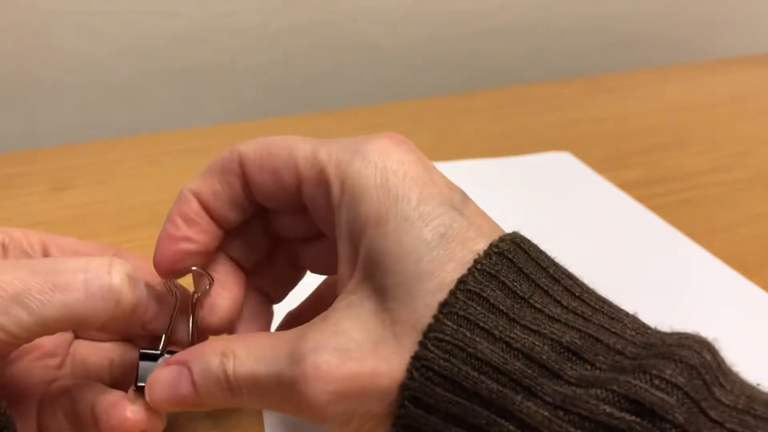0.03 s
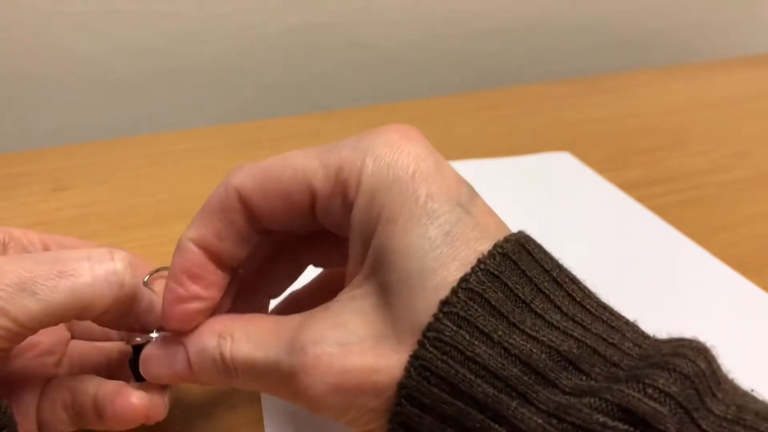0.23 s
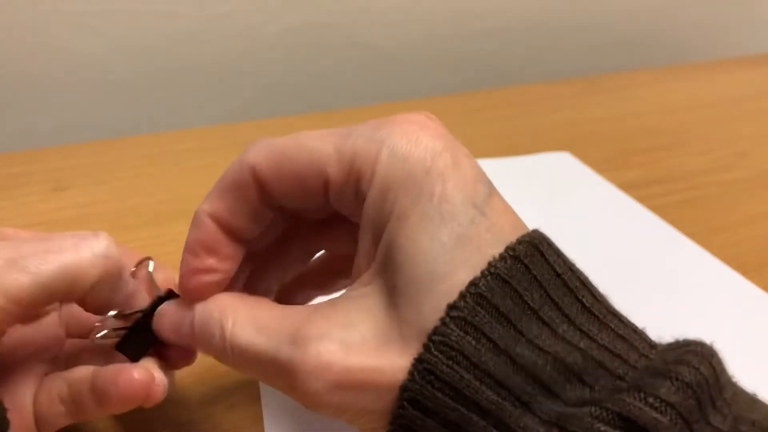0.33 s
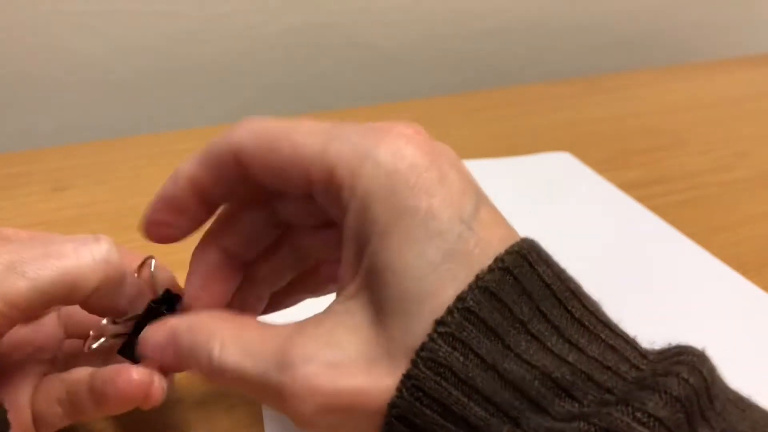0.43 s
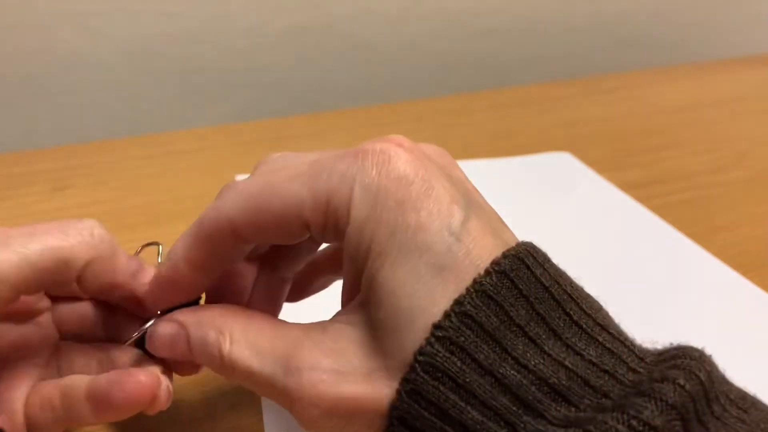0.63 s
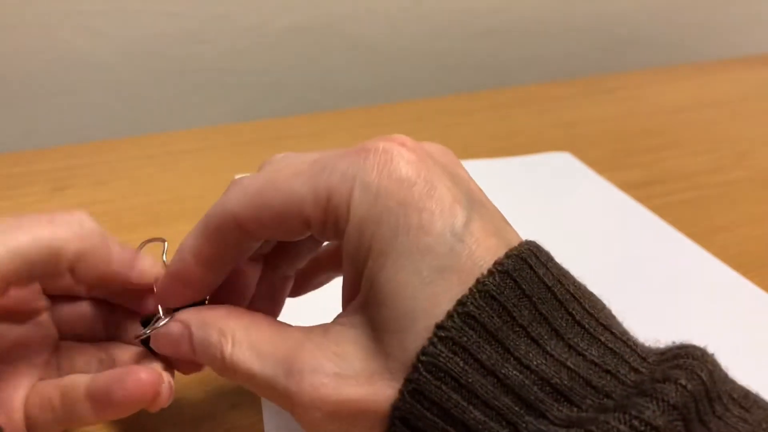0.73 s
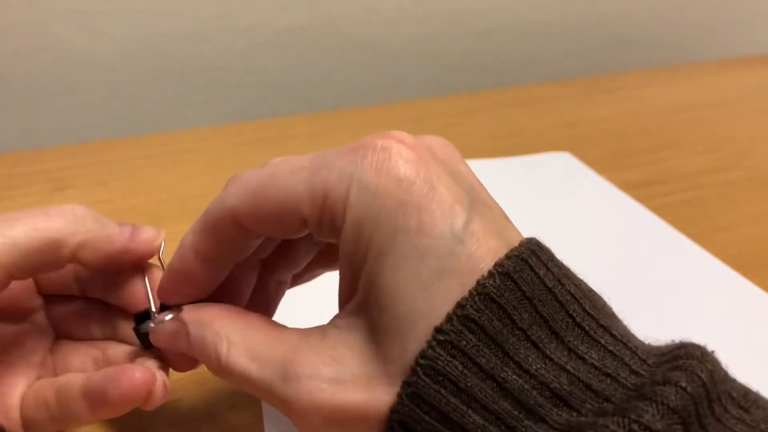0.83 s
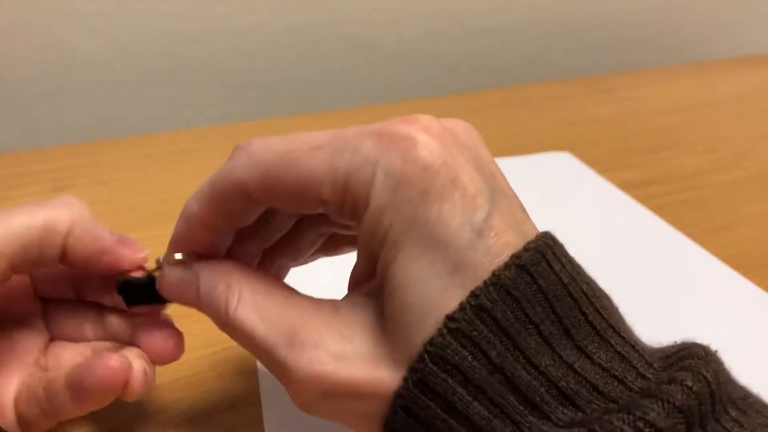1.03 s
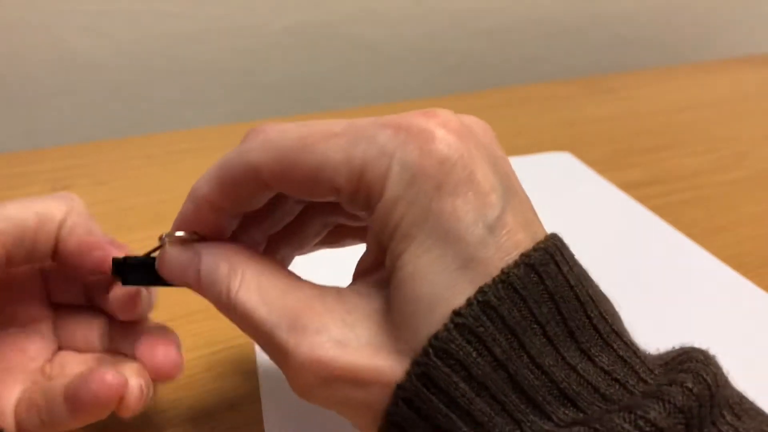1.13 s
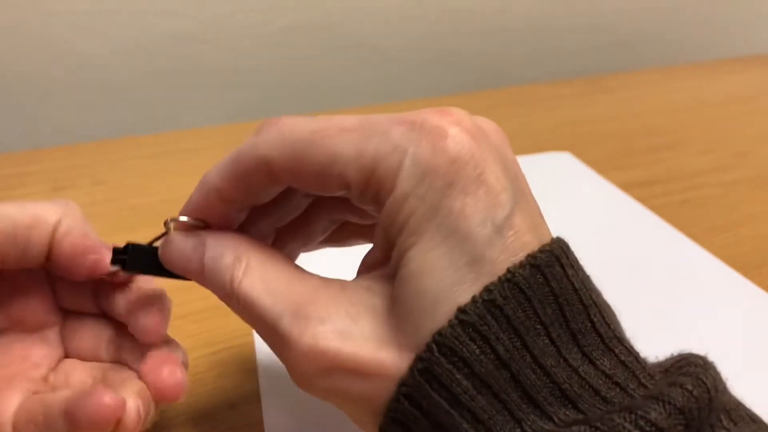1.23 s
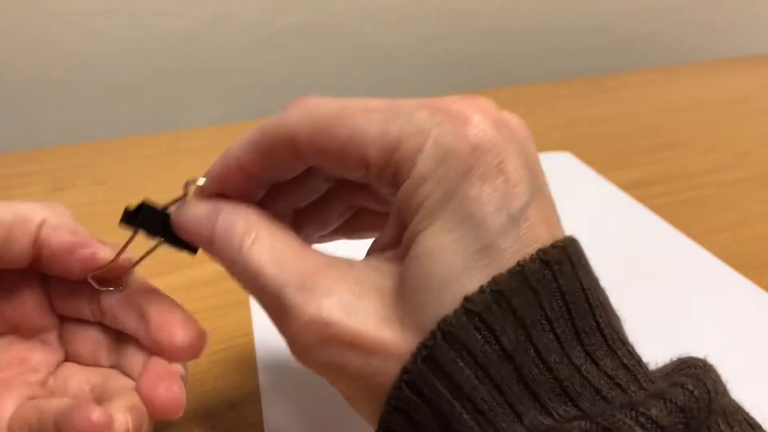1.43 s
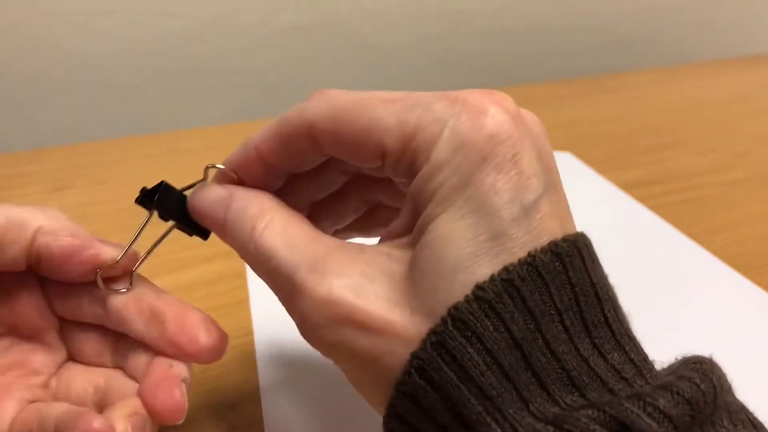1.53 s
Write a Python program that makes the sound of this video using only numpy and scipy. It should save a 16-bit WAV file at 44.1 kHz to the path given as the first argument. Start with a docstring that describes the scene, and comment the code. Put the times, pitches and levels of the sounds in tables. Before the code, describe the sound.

Close up, the wire handles of a steel binder clip scrape and flip over with two quick, bright snaps. Lighter ticks and the rubbing of fingers then thin out over a low room hum.

```python
"""Binder clip in a quiet room

One microphone, close to two hands working the wire handles of a steel binder clip above a table.
The handles scrape in their sockets and flip over twice, hitting the spring with a sharp, ringing snap,
the first with a soft thud in the hand. Small ticks of the wire and finger rubs surround the snaps.
Farther off, the walls give the metal a short tail, and a low room hum lies under it all."""
import sys
import numpy as np
from scipy import signal
from scipy.fft import rfft, irfft
from scipy.io import wavfile
from scipy.ndimage import uniform_filter1d

SR = 44100
rng = np.random.default_rng(int(sys.argv[2]) if len(sys.argv) > 2 else 0)


def master(y):
    """Save y as 16-bit WAV."""
    cut = np.clip(np.atleast_2d(y).T, -1, 1)
    pcm = np.round(cut * 32767)  # scale
    wavfile.write(sys.argv[1], SR, pcm.astype(np.int16))


N = 70560
T = np.arange(N) / SR

# room tone: (frequency [Hz], relative level [dB])
AIR_SPECTRUM = [(20, -20), (42, -21.5), (65, -10), (100, -5), (170, -7.5), (250, -8.5), (370, -10.5),
                (600, -19), (900, -24), (2000, -30.5), (4000, -32.5), (9000, -35.5), (16000, -38.5)]
# hum in the room: (frequency [Hz], level [dB], width [Hz])
HUM_LINES = [(201, -68.5, 6.4), (298.5, -72.5, 9), (438.9, -82, 30)]
# the deepest hum swells and dips: (time [s], relative level [dB])
LOW_HUM_LEVELS = [(0.0, -75), (0.03, -72.5), (0.204, -66), (0.65, -62), (0.792, -81.5), (0.836, -66),
                  (1.068, -73.5), (1.09, -63), (1.322, -82), (1.35, -82), (1.398, -68), (1.6, -67.5)]
AIR_DB, LOW_HUM_GAIN_DB, LOW_HUM_HZ, LOW_HUM_WANDER_HZ = -62, 1, 65.3, 3
# the walls give back the lower notes more strongly: (frequency [Hz], relative gain [dB])
WALL_COLOUR = [(400, 10.5), (1200, 14.5), (2500, 8.5), (5000, -3), (10000, 1.5), (16000, -1)]
ROOM_DB, ROOM_T60_S, ROOM_DELAY_S = -21.5, .15, .0024

FINGER_RUBS = [(-0, 0.108, -86.5, 10.5), (0.197, 0.238, -61, -4), (.232, 0.283, -65.5, -5),
               (.34, 0.396, -63.5, -10), (.385, 0.434, -62, -2), (0.471, 0.507, -66.5, -13),
               (0.621, .67, -69, -9), (1.13, 1.284, -68, -23), (1.288, 1.403, -75, -5),
               (1.443, 1.50, -81.5, -8.5)]
# hiss of skin on steel: (frequency [Hz], relative level [dB])
SKIN_SPECTRUM = [(300, 4), (600, 9.5), (1500, -8.5), (3000, 0), (5500, 2), (9000, -4.5), (12000, -6),
                 (16000, -8.5)]
HAND_KNOCKS = [(0.2168, -48), (0.2236, -39.5), (0.2509, -46.5)]
# resonances of the hand: (frequency [Hz], gain [dB], t60 [s])
HAND_MODES = [(153, 2.5, 0.043), (205, -8.5, 0.05), (320, -6.5, .05)]
THUD_BAND_HZ = (120, 500)

# a handle turns in its socket:
# (start [s], end [s], level [dB], swell [dB], pitch [Hz], second pitch [Hz], second re first [dB])
SOCKET_SCRAPES = [(0.026, 0.158, -82, 5, 7950, 6000, -23), (0.174, .214, -62.5, 13, 8100, 6150, -7),
                  (0.317, 0.38, -62.5, 17.5, 6750, 11600, -10), (0.46, .586, -71.5, -4, 7700, 6160, -2.5),
                  (0.691, .762, -73.5, 4.5, 6750, 7430, -4.5), (0.78, 0.865, -75, 9, 6680, 7400, -14),
                  (0.982, 1.039, -77.5, -0.5, 7460, 12240, -2)]
SCRAPE_WIDTH_HZ, SLIPS_PER_S, SCRAPE_FADE_S = 751, 6000, .012
# slips and bounces of the wire: (time [s], force level [dB], pitch [Hz], edge gain [dB])
WIRE_TICKS = [(.046, -30, 7760, -17), (.0835, -43, 7860, 1), (0.2031, -23, 8100, -1.5),
              (0.2085, -11.5, 9600, 2.5), (0.2202, -9, 10200, -10), (0.2229, -11, 7000, 2),
              (0.3493, -19, 6900, -11), (0.3601, -9, 6850, -21), (0.362, -26, 6750, -12),
              (0.3754, -0.5, 7240, -4.5), (.3807, -11.5, 7260, -5.5), (0.3822, -22, 7000, -0.5),
              (0.4776, -15.5, 6100, -15.5), (0.4801, -26, 7700, -11), (.5197, -32, 8100, -20),
              (.570, -35, 7610, -12), (0.635, -31, 6060, -23), (0.744, -31.5, 6600, -23),
              (0.7564, -23.5, 6550, -19), (.8468, -31, 6650, -12), (0.8694, -16, 6720, -22),
              (0.8702, -28.5, 7500, -27), (1.086, -41.5, 6990, -4.5)]
TICK_WIDTH_HZ, TICK_GRIT_DB, TICK_T60_S = 640, -2.5, .008

# a handle lands: (time [s], overall gain [dB], chatter gain [dB], shimmer gain [dB], ring gain [dB])
HANDLE_SNAPS = [(.2110, 2, -8, -11, -8.5), (.3735, 0.5, -7, -17.5, -34)]
# colour of the crack, one list for each snap: (frequency [Hz], gain [dB])
CRACK_COLOURS = [
    [(500, -33), (1500, -25.5), (2400, -13), (2700, -13), (3200, -5.5), (5100, -4.5), (5900, 13),
     (6500, -2.5), (7000, 2.5), (7600, 0), (8400, 6.5), (10150, 13.5), (11000, 4.5), (12900, -2.5),
     (14200, -4), (15400, 4.5), (17000, -9.5)],
    [(500, -21.5), (1100, -24), (1800, -17), (2300, -37), (3300, -67), (4600, -21), (5400, 0), (6000, 10),
     (6700, 9.5), (7400, 4), (8100, 2.5), (9300, -12.5), (10800, -2), (11600, 5.5), (12500, -0.5),
     (14300, -13.5), (15500, -17), (17000, -21)],
]
# the spring steel, two close clusters and a few lone modes: (frequency [Hz], gain [dB], t60 [s])
SPRING_MODES = [(5635, -42, .055), (5785, -41, .055), (5945, -39, .06), (6040, -43, .06), (6170, -47, .07),
                (8005, -49, .09), (9160, -46, .06), (9305, -43, .07), (9830, -42, .06), (10068, -37, .08),
                (10210, -38, .07), (10310, -30, .022), (11470, -50, .06), (15250, -47, .06)]
CHATTER_DELAY_S, CHATTER_T60_S = .0001, .0048   # the wire buzzes against the sheet just after it lands
SHIMMER_T60_S = .04   # dense, short-lived modes of the sheet
RING_TAIL_DB, RING_TAIL_T60_S = 1, .17   # dying noise gives the steel's ring a rough, diffuse tail
CUTOFF_HZ = 16700


def from_db(db):
    """Decibels to gain."""
    return 10 ** (np.asarray(db) / 20)


def unit_rms(x):
    """Scale to unit rms."""
    return x / np.sqrt(np.mean(x ** 2) + 1e-20)


def at(s, x):
    """The sound x, starting at time s."""
    return np.concatenate([np.zeros(max(round(s * SR), 0)), x, np.zeros(N)])[:N]


def colour(x, points):
    """Causal (minimum-phase) filter that follows a table of (frequency [Hz], gain [dB])."""
    size = 2 * N
    hz, db = np.transpose(points)
    bin_hz = np.arange(N + 1) * SR / size
    gain = from_db(np.interp(np.log(bin_hz + 1), np.log(hz), db))
    cepstrum = irfft(np.log(gain))
    cepstrum[1:N] *= 2
    cepstrum[N + 1:] = 0
    return irfft(rfft(x, size) * np.exp(rfft(cepstrum)))[:N]


def ring(x, hz, t60):
    """One mode: a unit click in x starts a dying sine of height 1."""
    r, w = from_db(-60 / (t60 * SR)), 2 * np.pi * hz / SR
    return signal.lfilter([0, np.sin(w)], [1, -2 * r * np.cos(w), r * r], x + 1e-18)


def resonate(x, hz, width_hz):
    """A resonance with peak gain 1, applied twice for steep skirts."""
    r, w = np.exp(-np.pi * width_hz / SR), 2 * np.pi * hz / SR
    feed = np.array([1, 0, -1]) * (1 - r * r) / 2
    for _ in range(2):
        x = signal.lfilter(feed, [1, -2 * r * np.cos(w), r * r], x + 1e-18)
    return x


def burst(t60, passes=4):
    """Dying noise of unit energy; each pass evens out its spectrum, then restores the decay."""
    fade = from_db(-60 * np.minimum(T / t60, 4))
    x = rng.standard_normal(N) * fade
    for _ in range(passes):
        spectrum = rfft(x)
        x = irfft(spectrum / (abs(spectrum) + 1e-12), N)
        power = uniform_filter1d(x * x, int(t60 * SR / 10) + 2)
        x = x * fade / np.sqrt(abs(power) + 1e-14)
    return x / np.sqrt(np.sum(x * x))


def room_tone():
    """Air all round the microphone, with a few wavering hum lines."""
    air = from_db(AIR_DB) * unit_rms(colour(rng.standard_normal(N), AIR_SPECTRUM))
    hum = sum(from_db(db) * unit_rms(resonate(rng.standard_normal(2 * N), hz, width)[N:])
              for hz, db, width in HUM_LINES)
    wander = unit_rms(uniform_filter1d(rng.standard_normal(N), SR // 10))
    low_hz = LOW_HUM_HZ + LOW_HUM_WANDER_HZ * wander
    low_db = LOW_HUM_GAIN_DB + np.interp(T, *np.transpose(LOW_HUM_LEVELS))
    low_hum = unit_rms(np.sin(2 * np.pi * np.cumsum(low_hz) / SR))
    return air + hum + from_db(low_db) * low_hum


def wall_reflections(x):
    """A short diffuse tail reaches the microphone just behind the direct sound."""
    tail = colour(at(ROOM_DELAY_S, burst(ROOM_T60_S, passes=0)), WALL_COLOUR)
    return from_db(ROOM_DB) * signal.fftconvolve(x, tail)[:N]


def finger_rubs():
    """Skin friction, a bright hiss over a dull rustle, swells and fades with each move of the fingers."""
    hiss = unit_rms(colour(rng.standard_normal(N), SKIN_SPECTRUM))
    rustle = unit_rms(resonate(rng.standard_normal(N), hz=800, width_hz=1500))
    out = 0
    for start, end, db, rustle_db in FINGER_RUBS:
        effort = np.sqrt(abs(np.sin(np.interp(T, [start, end], [0, np.pi]))))
        out += from_db(db) * effort * (hiss + from_db(rustle_db) * rustle)
    return out


def hand_thuds():
    """The hand catches the recoil and answers with a dull knock."""
    knocks = sum(at(s, [from_db(db)]) for s, db in HAND_KNOCKS)
    soften = signal.butter(2, THUD_BAND_HZ, "band", fs=SR, output="sos")
    push = signal.sosfilt(soften, knocks + 1e-18)
    return sum(from_db(db) * ring(push, hz, t60) for hz, db, t60 in HAND_MODES)


def socket_scrapes():
    """Dense tiny slips keep two resonances of the wire singing, louder where the spring is tighter."""
    out = 0
    for start, end, db, swell_db, hz, second_hz, second_db in SOCKET_SCRAPES:
        slips = (rng.random(N) < SLIPS_PER_S / SR) * rng.standard_normal(N)
        first, second = [unit_rms(resonate(slips, f, SCRAPE_WIDTH_HZ)) for f in (hz, second_hz)]
        stroke = np.clip(np.minimum(T - start, end - T) / SCRAPE_FADE_S, 0, 1)
        tension_db = swell_db * np.interp(T, [start, end], [-.5, .5])
        out += from_db(db + tension_db) * stroke * (first + from_db(second_db) * second)
    return out


def wire_ticks():
    """Each slip rings one damped resonance of the wire and has a bright edge."""
    out = 0
    for s, db, hz, edge_db in WIRE_TICKS:
        force = at(0, [1.]) + from_db(TICK_GRIT_DB) * burst(TICK_T60_S)
        tone = resonate(force, hz, TICK_WIDTH_HZ)
        edge = from_db(edge_db) * resonate(force, hz=8500, width_hz=4900)
        out += from_db(db) * at(s, tone + edge)
    return out


def handle_snaps():
    """A handle hits the spring: a crack with chatter and shimmer, then the steel rings roughly."""
    out, click = 0, at(0, [1.])
    for (s, db, chatter_db, shimmer_db, ring_db), crack_colour in zip(HANDLE_SNAPS, CRACK_COLOURS):
        chatter = from_db(chatter_db) * at(CHATTER_DELAY_S, burst(CHATTER_T60_S))
        shimmer = from_db(shimmer_db) * burst(SHIMMER_T60_S)
        crack = colour(click + chatter + shimmer, crack_colour)
        ring_tail = from_db(RING_TAIL_DB) * burst(RING_TAIL_T60_S)
        steel = sum((-1) ** k * from_db(mode_db + ring_db) * ring(click + ring_tail, hz, t60)
                    for k, (hz, mode_db, t60) in enumerate(SPRING_MODES))
        out += from_db(db) * at(s, crack + steel)
    return out


def scene():
    """Metal and hands up close, the room behind them, in mono."""
    metal = handle_snaps() + wire_ticks() + socket_scrapes()
    return (metal + wall_reflections(metal) + finger_rubs() + hand_thuds() + room_tone())[None]


def record(dry):
    """The microphone signal, with the highest treble cut steeply."""
    lowpass = signal.cheby2(16, 60, CUTOFF_HZ, fs=SR, output="sos")
    return signal.sosfiltfilt(lowpass, dry)


dry = scene()
out = record(dry)
master(out)
```